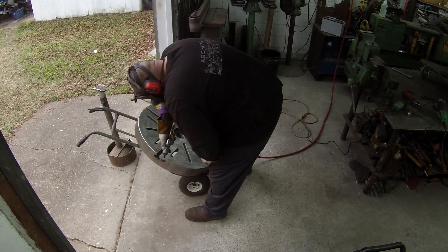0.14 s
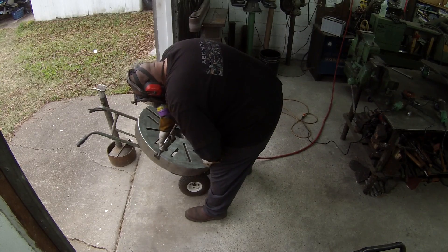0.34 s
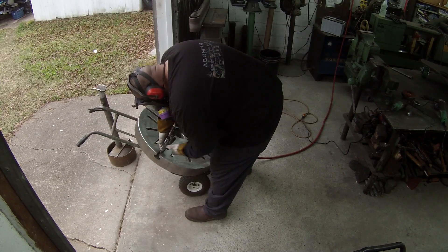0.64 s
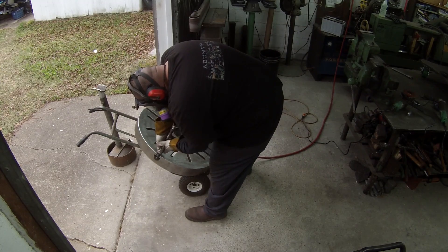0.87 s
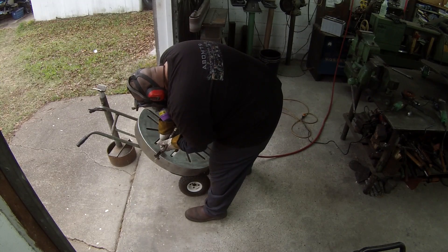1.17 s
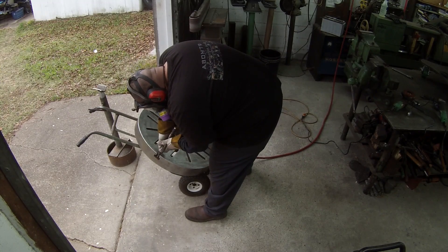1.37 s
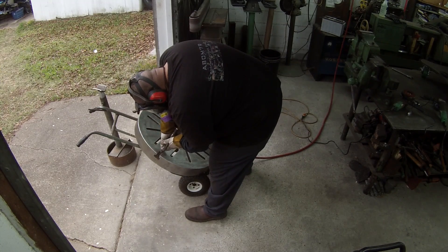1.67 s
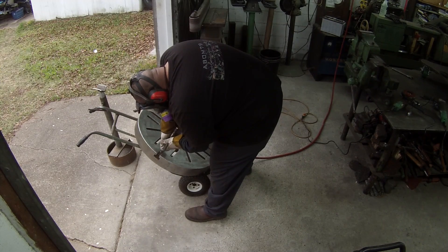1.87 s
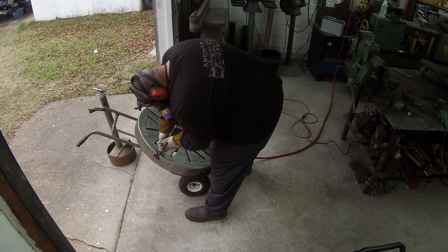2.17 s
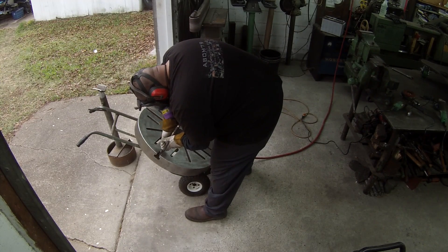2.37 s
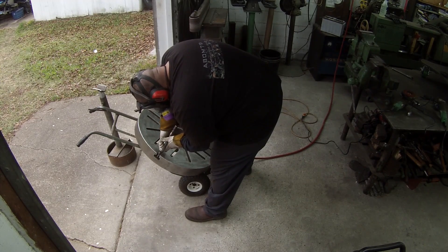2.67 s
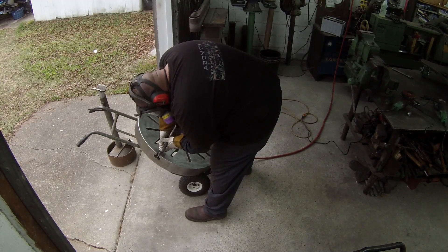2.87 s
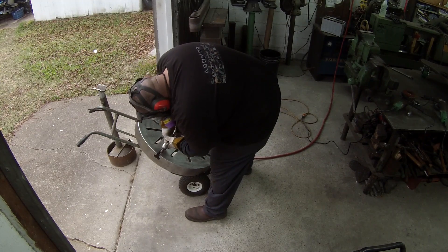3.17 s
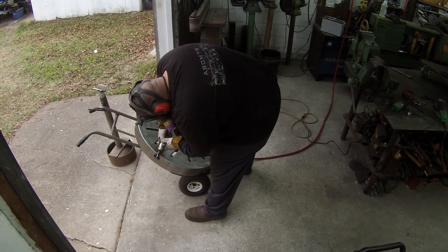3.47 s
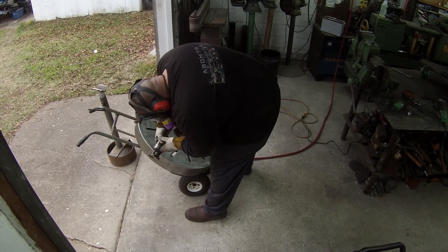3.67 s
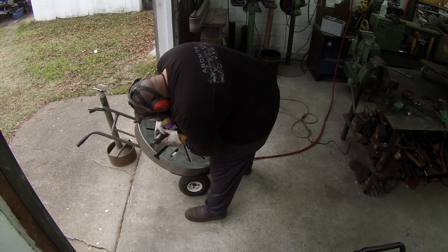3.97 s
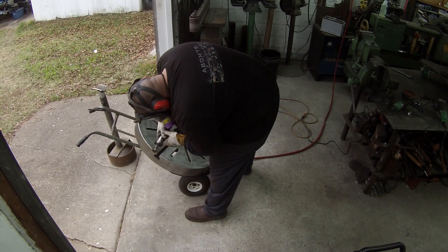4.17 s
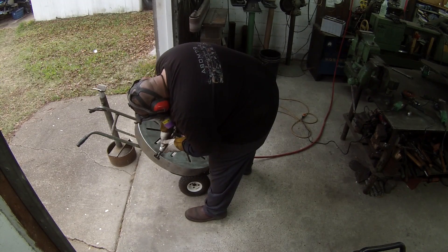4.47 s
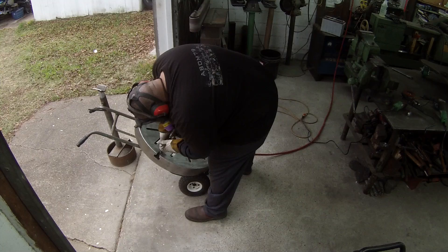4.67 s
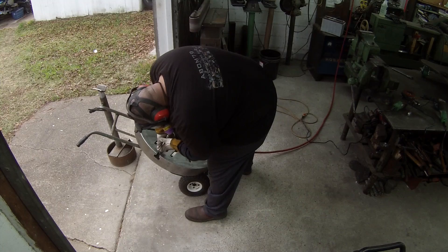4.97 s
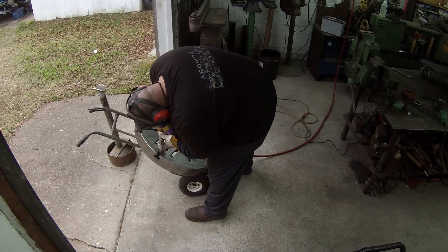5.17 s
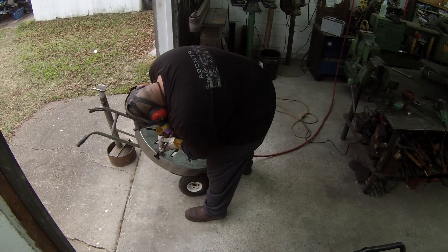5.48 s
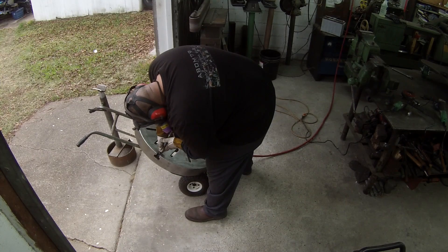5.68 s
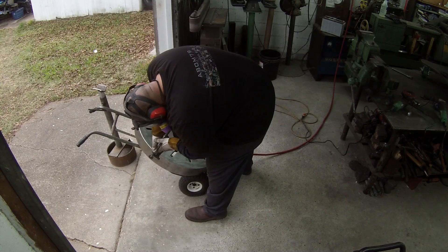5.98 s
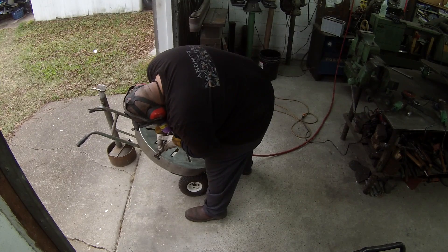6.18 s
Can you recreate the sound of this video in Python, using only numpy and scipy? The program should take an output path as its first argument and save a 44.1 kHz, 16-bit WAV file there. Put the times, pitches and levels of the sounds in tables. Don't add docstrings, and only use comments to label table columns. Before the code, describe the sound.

Loud, bright air-tool grinding fills the first two and a half seconds: a piercing whine, hissing exhaust, sizzling wire tips and scraped iron. The lever is let go, the motor chuffs down, and a small metal part rings. About three seconds of fan rush and low hum swell up as the gain recovers, then a burst of air restarts the grinder. Close-to-mid pickup in a concrete-floored shop, nearly mono.

```python
import sys
import numpy as np
from scipy import signal
from scipy.fft import rfft, irfft, next_fast_len
from scipy.io import wavfile
from scipy.ndimage import uniform_filter1d

SR = 44100
rng = np.random.default_rng(int(sys.argv[2]) if len(sys.argv) > 2 else 0)


def gain_from_decibels(decibels):
    exponent = np.asarray(decibels, float) / 20
    return 10 ** exponent


def wav_record(signal):
    frames = np.transpose(np.atleast_2d(signal))
    bounded = np.clip(frames, -1, 1)
    quanta = np.round(bounded * 32767).astype(np.int16)
    wavfile.write(sys.argv[1], SR, quanta)


N = 279153
TIME_S = np.arange(N) / SR


def unit(x):
    return x / np.sqrt(np.mean(x ** 2) + 1e-20)


def in_time(rows):
    s, *columns = np.transpose(rows)
    return [np.interp(TIME_S, s, column) for column in columns]


def bumps(rows):
    t = np.arange(0, N / SR + .002, .001)
    swell = sum(height * np.exp(-.5 * ((t - s) / half_s) ** 2) for s, half_s, height in rows)
    return np.interp(TIME_S, t, swell)


def drift(rate_hz):
    r = np.exp(-64 * np.pi * rate_hz / SR)
    white = rng.standard_normal(N // 32 + 2002)
    slow = signal.lfilter([1], [1, -2 * r, r * r], white)[2000:]
    return np.interp(np.arange(N) / 32, np.arange(len(slow)), unit(slow - slow.mean()))


def coloured(white, spectrum, patchy_db, patch_hz):
    hz, db = np.transpose(spectrum)
    size = next_fast_len(N)
    octave = np.log2(np.maximum(np.arange(size // 2 + 1) * SR / size, 1))
    shaped = rfft(white, size) * gain_from_decibels(np.interp(octave, np.log2(hz), db, left=-120))
    out = np.zeros(N)
    for centre in np.arange(np.log2(hz[0]), np.log2(hz[-1]) + .5, .5):
        part = np.cos(np.pi * np.clip(octave - centre, -.5, .5)) ** 2
        out += gain_from_decibels(patchy_db * drift(patch_hz)) * irfft(shaped * part, size)[:N]
    return unit(out)


# pitch_hz, level_db (per Hz)
FAN_COLOUR = [(20, -44), (30, -11), (70, -19), (110, 0), (170, -11.5), (260, -6), (400, -4.5), (600, -1),
              (1100, 3.5), (1600, -5), (3000, -11.5), (5300, -19), (6800, -29.5), (15600, -40.5)]


def fan_rush():
    return gain_from_decibels(-35.1) * coloured(rng.standard_normal(N), FAN_COLOUR, patchy_db=.3, patch_hz=8.)


# pitch_hz, width_hz, level_db
DRONE_LINES = [(335, 3.4, -65), (367, 5, -64), (453, 6.1, -56), (523, 4, -76.5), (566, 2.9, -50),
               (700, 1.2, -49), (850, 3, -52.5), (1054, 5.1, -65), (1157, 2.8, -51)]


def drone():
    out = np.zeros(N)
    for hz, width_hz, db in DRONE_LINES:
        r = np.exp(-np.pi * width_hz / SR)
        resonance = [1, -2 * r * np.cos(2 * np.pi * hz / SR), r * r]
        line = signal.lfilter([1, 0, -1], resonance, rng.standard_normal(N + SR))
        out += gain_from_decibels(db) * unit(line[SR:])
    return out


# pitch_hz, level_db
HUM_TONES = [(59.8, -62.5), (100, -56.5), (119.9, -52.5), (240, -67)]


def mains_hum():
    return sum(np.sqrt(2) * gain_from_decibels(db + 1.5 * drift(2.8)) * np.sin(2 * np.pi * hz * TIME_S)
               for hz, db in HUM_TONES)


# centre_s, half_length_s, loss_db
BLADE_FADES = [(2.9, 0.1, 3.5), (3.88, 0.036, 8), (4.2, 0.093, 10), (4.63, .05, 10), (4.98, 0.073, 4.5),
               (5.48, 0.055, 11)]


def blade_tone():
    pitch_hz = 300 + 2.3 * drift(2.24)
    level_db = -46 - bumps(BLADE_FADES) + 2.7 * drift(12.0)
    return np.sqrt(2) * gain_from_decibels(level_db) * np.sin(2 * np.pi * np.cumsum(pitch_hz) / SR)


# start_s, pitch_hz, level_db, t60_s
METAL_TICKS = [
    (2.605, 4020, -33, .25),
    (2.64, 3800, -43, .2),
    (3.342, 9800, -49, .006),
    (3.406, 9700, -44, .007),
    (3.423, 9600, -53, .006),
]


def ticks():
    out = np.zeros(N)
    age_s = np.arange(SR // 2) / SR
    for s, hz, db, t60_s in METAL_TICKS:
        out[round(s * SR):][:SR // 2] += gain_from_decibels(db - 60 * age_s / t60_s) * np.sin(2 * np.pi * hz * age_s)
    return out


def background():
    return fan_rush() + drone() + mains_hum() + blade_tone() + ticks()


def shop(x):
    size = next_fast_len(N + SR // 2)
    w = 2 * np.pi * np.arange(size // 2 + 1) / size
    wall_cut_hz = 4600
    t60_s = 0.37 / np.sqrt(1 + (w * SR / (2 * np.pi * wall_cut_hz)) ** 2)
    echo = 0
    for k, lag in enumerate(rng.uniform(.016, .06, 16) * SR):
        loop = gain_from_decibels(-60 * lag / SR / t60_s) * np.exp(-1j * w * lag)
        echo = echo + (-1) ** k * loop / (1 - loop)
    return irfft(rfft(x, size) * echo, size)[:N]


SHUT_S, OPEN_S, OPEN_TAKES_S = 2.553, 5.6, .03


def lever():
    start_s = OPEN_S - OPEN_TAKES_S / 2
    shut = np.where(TIME_S < start_s, np.maximum(TIME_S - SHUT_S, 0), 0)
    return shut, np.maximum(TIME_S - start_s, 0)


FREE_HZ, SAG_HZ_PER_S, REFILLED_HZ = 338.6, 17.7, 329.4
COAST_S, SPOOL_S, SPOOL_SHAPE = .071, .096, 1.7
# centre_s,
# half_length_s, loss_hz
PRESSES = [(-0.06, 0.097, 53), (0.255, 0.068, 11.7), (0.405, 0.051, 16.9), (0.773, 0.11, 27.7),
           (1.003, 0.063, 13.3), (1.189, 0.072, 34.7), (1.404, 0.05, 19.959), (1.642, 0.11, 31.719),
           (1.881, 0.052, 24.379), (2.033, 0.048, 14.1), (2.232, 0.06, 12.268), (2.52, 0.022, 4.74),
           (5.828, .072, 55.8),
    (5.862, .018, 22),
    (5.938, .016, 8.08),
    (6.215, .026, 48),
    (6.39, 0.073, 48),
]


def shaft():
    shut, opened = lever()
    sagging_hz = FREE_HZ - SAG_HZ_PER_S * np.minimum(TIME_S, SHUT_S)
    free_hz = np.where(opened > 0, REFILLED_HZ, sagging_hz)
    driven_s = np.maximum(opened - OPEN_TAKES_S / 2, 0)
    spool_up = 1 - np.exp(-(driven_s / SPOOL_S) ** SPOOL_SHAPE)
    spin = np.maximum(np.where(opened > 0, spool_up, np.exp(-shut / COAST_S)), .08)
    load_hz = bumps(PRESSES)
    return spin * (free_hz - load_hz), spin, load_hz


# loudest_s, level_db, before_s and after_s (time to 10 dB down)
CHUFFS = [
    (2.595, -17.5, 0.022, .034),
    (5.638, -15, 0.012, 0.074),
]


def chuffs(turns):
    vane = 4 * turns
    size = gain_from_decibels(3.8 * rng.standard_normal(int(vane[-1]) + 1))[vane.astype(int)]
    bursts = size * np.exp(-5.0 * (vane % 1)) * rng.standard_normal(N)
    band = signal.butter(2, (430, 1900), "band", fs=SR, output="sos")
    gain = 0
    for s, db, before_s, after_s in CHUFFS:
        span_s = np.where(TIME_S < s, before_s, after_s)
        gain = gain + gain_from_decibels(db - 10 * ((TIME_S - s) / span_s) ** 2)
    return gain * unit(signal.sosfilt(band, bursts))


# level_db, shut_drop_db, fall_db_per_s, opening_burst_db,
# aim_share, contact_share
HISS_RULES = [
    (-24, 15.5, 200, 12.5, 1., 0.039),
    (-19, 20.5, 380, 1.5, 0.23, 1.),
    (-18.5, 12, 220, 9.5, 0.054, 0.17),
]


def hiss_levels(load_hz, aim_db, contact_db):
    shut, opened = lever()
    closed_db = np.where(opened > 0, 48 * np.clip(1 - opened / OPEN_TAKES_S, 0, 1), 0)
    burst = (opened > 0) * np.exp(-np.maximum(opened - OPEN_TAKES_S, 0) / 0.073)
    dropped = np.minimum(shut / 0.013, 1)
    falling_s = np.maximum(shut - 0.11, 0)
    levels = []
    for db, drop_db, fall_db, burst_db, aim, touch in HISS_RULES:
        hand_db = aim * aim_db + touch * contact_db
        levels.append(db + hand_db + burst_db * burst - closed_db - drop_db * dropped - fall_db * falling_s)
    air_db, wire_db, iron_db = levels
    return air_db, wire_db, iron_db + 0.0532 * load_hz + 2.5 * drift(14.2)


# pitch_hz, level_db (per Hz)
EXHAUST_COLOUR = [(2500, -26), (3300, -9), (3900, -12), (4400, -4), (5000, 0), (5400, -2), (5800, -8),
                  (7000, -11), (8400, -15), (9500, -24)]


def exhaust_air(turns):
    puff = 1 + 0.11 * np.cos(8 * np.pi * turns) + 0.26 * np.cos(2 * np.pi * turns)
    return coloured(puff * rng.standard_normal(N), EXHAUST_COLOUR, patchy_db=0.5, patch_hz=27.0)


# pitch_hz, level_db (per Hz)
WIRE_COLOUR = [(4500, -3), (7000, -2.5), (8500, -8.5), (9200, -3), (10700, -1), (12500, -2.5), (13800, -3),
               (15600, -9.5)]


def wire_tips(bite):
    struck = rng.random(N) < 12000 / SR
    tips = struck * gain_from_decibels(1.3 * rng.exponential(1, N)) * rng.choice([-1, 1], N)
    return coloured(bite * tips, WIRE_COLOUR, patchy_db=1.3, patch_hz=1.06)


# pitch_hz, level_db (per Hz)
IRON_COLOUR = [(150, -33), (250, -27), (430, -21.5), (750, -11), (1050, -3.5), (1500, -0.5), (2300, 2.5),
               (3100, 3.5), (3900, -5.5), (5200, -39)]


def scraped_iron(bite):
    return coloured(bite * rng.standard_normal(N), IRON_COLOUR, patchy_db=1.0, patch_hz=12.)


def hiss(turns, air_db, wire_db, iron_db):
    bite = gain_from_decibels(2.1 * np.cos(2 * np.pi * turns + 2.9))
    air = gain_from_decibels(air_db) * exhaust_air(turns)
    wires = gain_from_decibels(wire_db - 3.5) * wire_tips(bite)
    return air + wires + gain_from_decibels(iron_db - 8.0) * scraped_iron(bite)


def flutter():
    quick = drift(20.5)
    return np.minimum(unit(quick - uniform_filter1d(quick, int(0.27 * SR))), .8)


def pitch_loss(hz):
    floor_db = 11 * np.exp(-.5 * ((hz - 298) / 6) ** 2)
    return floor_db + 20.5 * np.maximum(np.log2(270 / hz), 0)


STRONG_MULTIPLES = {1: (-36.5, 1.5, 12), 2: (-27, 1.3, 14), 3: (-34.5, 2.5, 5.56), 4: (-16.5, 1.5, 0.),
                    6: (-32.5, 3.8, -1.1), 8: (-27.5, 3.2, -2.07), 11: (-38.5, 2.7, 10), 16: (-31, 6.4, 19)}
# centre_s, half_length_s, swell_db
AIR_GASPS = [
    (2.558, 0.0046, -5),
    (2.582, .014, 5.5),
    (5.65, 0.029, 0.5),
]
MULTIPLE_SWELLS = {2: [(6.2, 0.085, -1)], 6: [(5.76, 0.13, 7)], 8: [(2.42, 0.28, 1), (6.08, 0.068, 3)],
                   11: [(1.75, 0.44, 13.5)], 16: [(.3, 0.19, 7), (6.0, 0.16, 8.5)]}


def whine_levels(speed_hz, spin, aim_db):
    shut, opened = lever()
    rise_db = 60 * np.clip(1 - opened / .04, 0, 1)
    fall_db = 800 * np.maximum(shut - .045, 0)
    lever_db = np.where(opened > 0, rise_db, fall_db)
    levels = {}
    for k, (db, flutter_db, loss_db) in STRONG_MULTIPLES.items():
        swell_db = bumps(AIR_GASPS + MULTIPLE_SWELLS.get(k, []))
        moving_db = flutter_db * flutter() + loss_db * np.log2(spin)
        levels[k] = db + aim_db + moving_db - lever_db + swell_db - pitch_loss(k * speed_hz)
    return levels


# pitch_hz, level_db (re the air hiss, from the
PORT_COLOUR = [(300, -10), (1500, -11), (2200, -14), (2980, -16), (3130, -12), (3400, -20), (4400, -11),
               (5000, -7), (5450, -8), (5800, -20), (8600, -31), (9400, -20), (10600, -17), (13500, -33)]


def motor(turns, speed_hz, line_db, air_db, wire_db):
    on = np.flatnonzero(line_db[4] > -69.9)
    wobble = .01 * drift(30.3)[on]
    slack = np.clip(1 - speed_hz[on] / 265, 0, .5)
    port_hz, port_db = np.transpose(PORT_COLOUR)
    out = np.zeros(N)
    for k in range(1, 45):
        if k in line_db:
            level_db = line_db[k][on] + 9.5 * slack * drift(48.0)[on]
        else:
            colour_db = np.interp(np.log(k * speed_hz[on]), np.log(port_hz), port_db)
            pattern_db = 3.5 * (k % 4 == 0) + (k < 14) * (-2.5 if k % 2 else -.5)
            drive_db = air_db + .4 if k < 27 else wire_db - 1.5
            waver_db = 1.8 * drift(4.5) + 2.0 * drift(18.0)
            level_db = colour_db + pattern_db + (drive_db + waver_db)[on] - 30 * slack
        phase = k * (2 * np.pi * turns[on] + wobble) + rng.uniform(0, 2 * np.pi)
        out[on] += np.sqrt(2) * gain_from_decibels(level_db) * np.sin(phase)
    return out


# time_s, aim_db (exhaust turned to the listener), contact_db (wheel on iron)
HAND_MOVES = [(0, 0.5, 3.5), (.25, -1, 1), (.55, 0.5, 3), (1.0, 0, 0), (1.4, 0.5, 1), (1.65, -2.5, 0.5),
              (1.87, 0, 2), (2.22, 1.5, 0.5), (2.55, -1.5, -1.5), (5.6, -2, 1.5), (5.8, 1.5, -3),
              (6.0, 0, -2), (6.15, 0, -5), (6.33, 1, -5)]


def grinder():
    speed_hz, spin, load_hz = shaft()
    turns = np.cumsum(speed_hz) / SR
    aim_db, contact_db = in_time(HAND_MOVES)
    air_db, wire_db, iron_db = hiss_levels(load_hz, aim_db, contact_db)
    line_db = whine_levels(speed_hz, spin, aim_db)
    whine = motor(turns, speed_hz, line_db, air_db, wire_db)
    return whine + hiss(turns, air_db, wire_db, iron_db) + chuffs(turns)


# time_s, level_db
BACKGROUND_GAIN = [
    (0, -8),
    (2.55, -4.5),
    (2.8, -2.5),
    (3.15, 2.5),
    (5.6, 2),
    (5.75, -7),
    (6.33, -1.5),
]


def scene():
    tool = grinder()
    mono = tool + gain_from_decibels(-10.5) * shop(tool) + gain_from_decibels(in_time(BACKGROUND_GAIN)[0]) * background()
    return np.array([mono, mono])


def band_limit(x):
    return signal.sosfilt(signal.butter(12, 16380, fs=SR, output="sos"), x)


def record(dry):
    size = next_fast_len(N)
    spectrum = rfft(1.003 * np.tanh(dry / 1.29), size)
    hz = np.arange(spectrum.shape[1]) * SR / size
    spectrum *= np.clip((15320 - hz) / 120 + .5, 0, 1) ** 2
    mid = irfft(spectrum, size)[:, :N]
    treble = signal.sosfilt(signal.butter(4, 7500, "high", fs=SR, output="sos"), mid[0])
    side = gain_from_decibels(-15) * treble * np.maximum(drift(12.) - .6, 0) * drift(40.)
    return band_limit(mid + side * [[1], [-1]])


dry = scene()
out = record(dry)
wav_record(out)
```